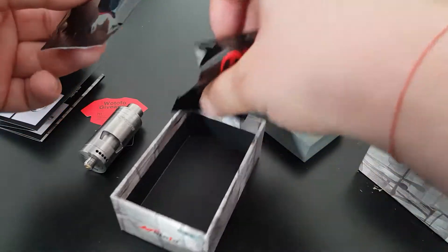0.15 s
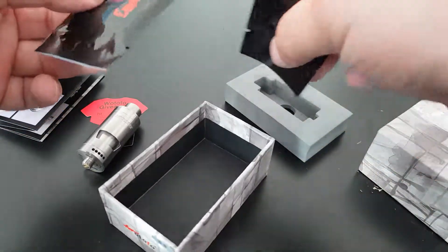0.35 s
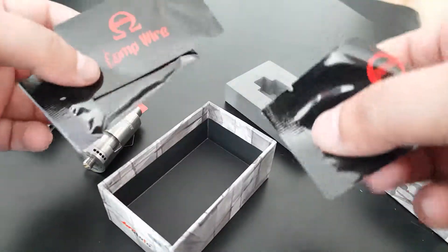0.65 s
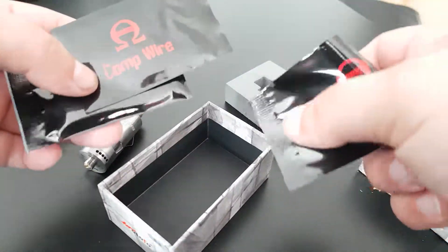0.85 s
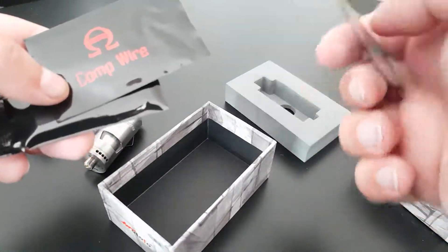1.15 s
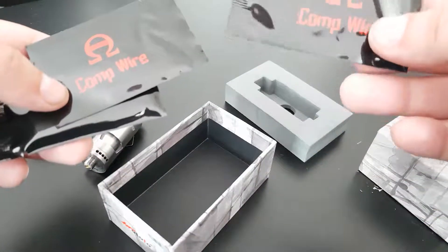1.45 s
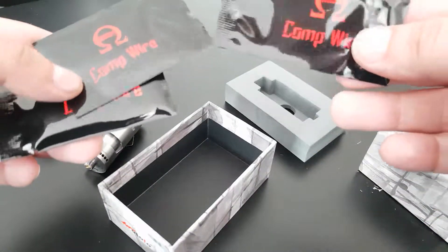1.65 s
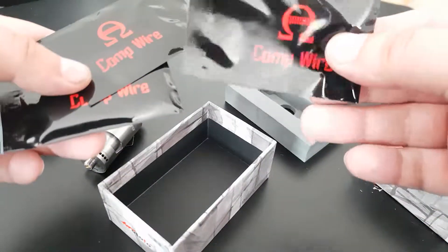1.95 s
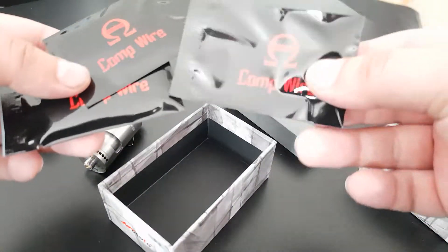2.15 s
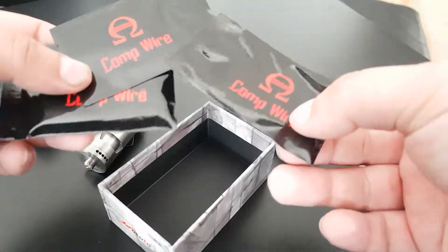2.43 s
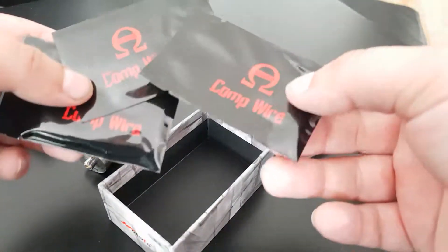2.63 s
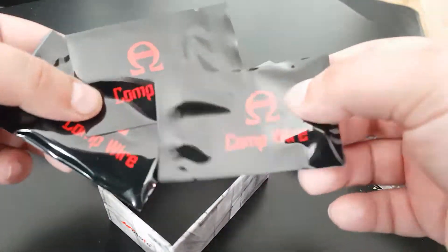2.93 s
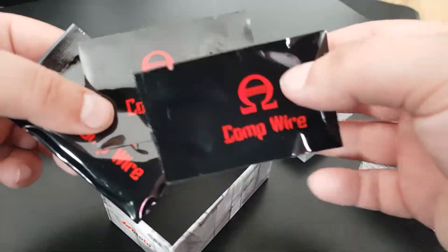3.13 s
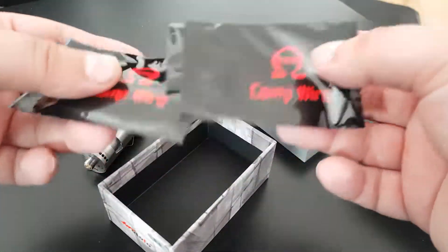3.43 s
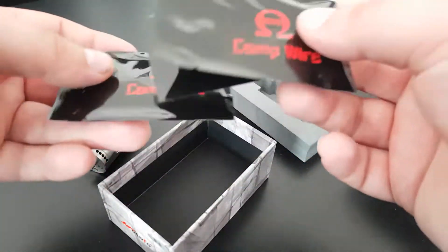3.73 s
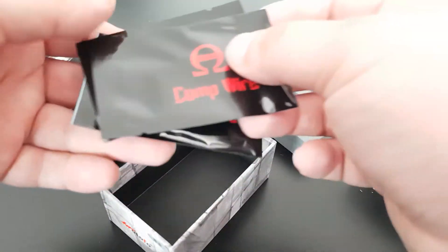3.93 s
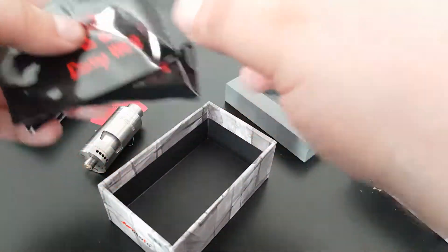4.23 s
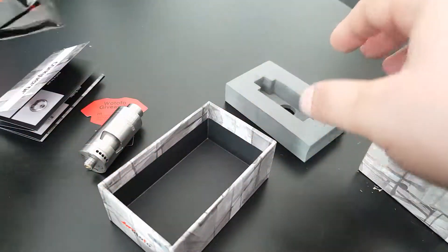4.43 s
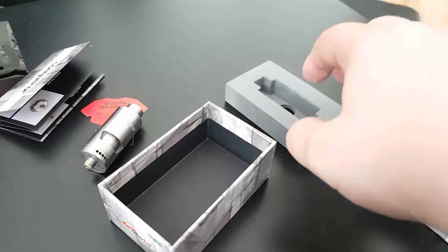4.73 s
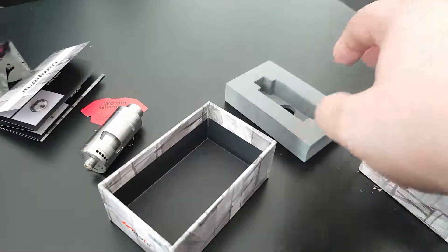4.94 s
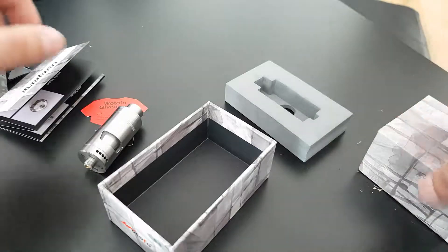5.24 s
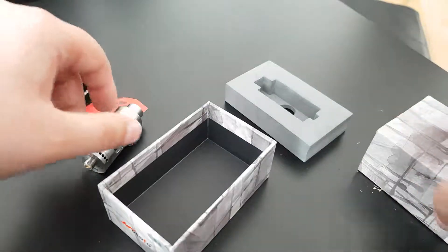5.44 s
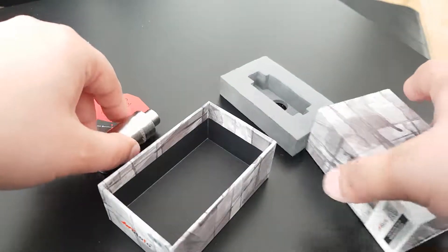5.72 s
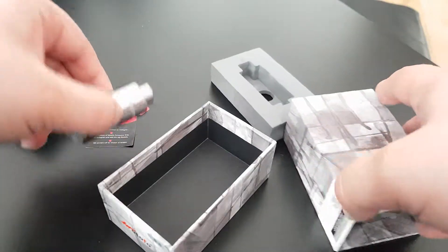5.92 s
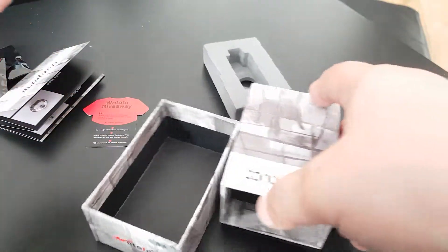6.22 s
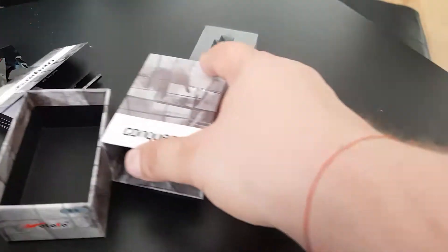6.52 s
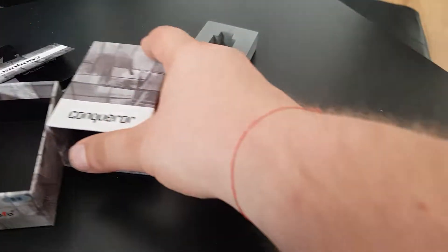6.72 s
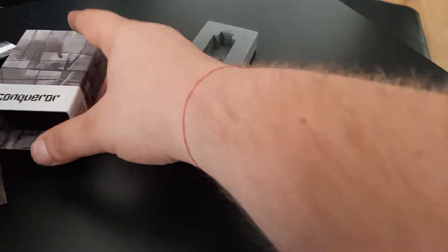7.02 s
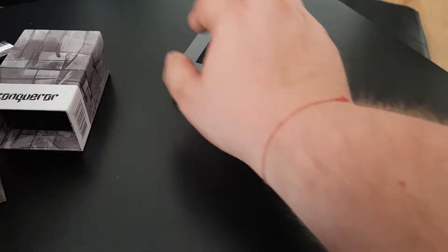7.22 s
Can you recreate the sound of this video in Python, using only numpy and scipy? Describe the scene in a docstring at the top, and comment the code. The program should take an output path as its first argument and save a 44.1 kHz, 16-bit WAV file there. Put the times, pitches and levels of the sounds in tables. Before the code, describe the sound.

Stereo, close and dry indoors over a faint low hum. After a brief card scrape, foil packets crinkle in irregular spurts, with several sharp snaps around two seconds and a cluster past four. A short lull follows, then dull knocks on the table, a firm cardboard clap, a lighter bump and two rough card slides, ending almost quiet.

```python
"""Crisp foil crackle and sharp snaps come first, then knocks on a table and the dry glide of cardboard.
Close by, small sachets are pulled from a box and turned in the fingers: rubbed film is slip noise, snaps ring briefly.
They are laid aside, a metal part knocks as it is picked up, and the box sleeve glides, bumps the tray and pushes it
across the table: softened blows ring modes, card slides as uneven slips, some resonances sound hollow.
A small room with a low noise hum and a diffuse tail, heard through two spaced microphones."""
import sys
import numpy as np
from scipy import signal
from scipy.io import wavfile

SR = 44100
rng = np.random.default_rng(int(sys.argv[2]) if len(sys.argv) > 2 else 0)


def materialize(psi):
    """Save the field psi as 16-bit PCM at rate SR to the path in sys.argv[1].

    A 1-D psi becomes a single channel; in a 2-D psi each row is a channel.
    """
    bounded = np.clip(np.atleast_2d(psi).T, -1, 1)
    quanta = np.round(bounded * 32767).astype(np.int16)
    wavfile.write(sys.argv[1], SR, quanta)


N = 325017

# colour of the air in the room: f/Hz, relative density/dB per Hz
AIR_COLOUR = [(350, -3), (1000, -9.5), (1600, -19), (16000, -17)]
# colour of the low hum: f/Hz, relative density/dB per Hz
HUM_COLOUR = [(25, -5.5), (36, 12), (55, -24.5), (85, 8), (130, 6), (170, -0.5), (220, 4.5), (280, 4),
              (380, -29)]
# hum of the room, swelling as the table rumbles under the arms and the sliding box: t/s, level/dB before panning
HUM_LEVEL = [(0, -60), (1.9, -59), (2.8, -61.5), (4.1, -55.5), (5.4, -57), (6.4, -50.5), (7.37, -54.5)]
# colour of the room tail: f/Hz, relative density/dB per Hz
TAIL_COLOUR = [(200, 4), (1000, 1.5), (7000, -3.5), (16000, 3)]
# decay of the room tail: f/Hz, t60/s
TAIL_T60 = [(300, 0.27), (5000, 0.25), (15000, 0.17)]
# likeness of the two microphones: f/Hz, left-right correlation
MIC_LIKENESS = [(300, 0.95), (700, 0.52), (1300, 0.077), (16000, 0)]

# blows on the table top: t/s, relative level/dB, softness as cut-off f/Hz
TABLE_BLOWS = [(5.503, -28, 300), (5.519, -22, 210), (5.5875, -17.5, 1740), (5.728, -26, 181),
               (6.14, -33, 904), (7.342, -37, 350)]
# blows on the open cardboard tray: t/s, relative level/dB, softness as cut-off f/Hz
TRAY_BLOWS = [(.095, -36, 780), (.845, -39.5, 1210), (4.927, -39, 1022), (6.2872, -23.5, 1140),
              (6.296, -26.5, 1100), (6.3325, -36, 5970), (6.862, -30, 960)]
# the sleeve drops on the table and bounces: t/s, relative level/dB, softness as cut-off f/Hz
SLEEVE_BLOWS = [(6.1392, -13.5, 2040), (6.1618, -25, 1963), (6.177, -32.5, 2300)]
# modes of the table top: f/Hz, relative level/dB, t60/s
TABLE_TOP_MODES = [(138.7, -53, .25), (213, -16, 0.19), (266, 13, 0.028), (277, 9, 0.083),
                   (347, -7.5, 0.04), (507, -8, 0.044), (605, -12, 0.086), (940, -17, 0.094),
                   (1168, -12.5, .05)]
# modes of the sleeve: f/Hz, relative level/dB, t60/s
SLEEVE_MODES = [(502, -19.5, 0.089), (871, -2, 0.035), (1080, -3, 0.012), (1345, -1, 0.025),
                (1990, 3.5, 0.019)]
# modes of the tray: f/Hz, relative level/dB, t60/s when struck (halved under sliding)
TRAY_BODY_MODES = [(225, -1.5, 0.033), (493, -17.5, 0.13), (906, 0, 0.017), (1093, -6, 0.065),
                   (1312, -4, 0.01), (2100, 1.5, 0.018), (2700, 2.5, 0.023)]

# pushes sliding on cardboard, or cardboard on the table: start t/s, length/s, scrape level/dB, hiss level/dB
# (levels at the start, before judder and panning)
CARD_PUSHES = [(.035, .11, -54.5, -46), (5.5, 0.37, -58.5, -54.5), (5.93, 0.093, -64.5, -55.5),
               (6.13, 0.38, -60, -51), (6.34, 0.1, -49.5, -43.5), (6.47, 0.39, -50, -47.5),
               (6.88, 0.15, -47, -48)]
# colour of the card's scrape: f/Hz, relative density/dB per Hz
SCRAPE_COLOUR = [(330, 10.5), (480, -13), (700, 12.5), (1050, 3), (1500, 13), (2800, -22.5)]
# colour of the card's hiss: f/Hz, relative density/dB per Hz
CARD_HISS_COLOUR = [(2000, 3.5), (2900, 5.5), (4400, 4.5), (9000, -2), (13000, 4.5), (16000, -8.5)]
# resonances of the open sleeve while it glides: start t/s, length/s, level/dB, f/Hz, t60/s
SLEEVE_HOLLOWS = [(5.496, 1, -58.5, 1220, 0.018), (5.502, 0.36, -65.5, 3300, 0.039),
                  (6.884, 0.13, -47, 1092, 0.035)]
# a card edge chatters on the table: t/s, level/dB at the swell's peak, f/Hz
EDGE_CHATTER = [(6.378, -47, 2580), (6.391, -48.5, 1290), (6.44, -49, 3100), (.105, -55.5, 793)]

# foil creases at set times, from faint ticks to sharp snaps:
# t/s, relative crack level/dB, crack f/Hz, relative level of the sheet's low flex/dB
FOIL_SNAPS = [(.0258, -38, 4800, -35.5), (.2514, -30, 2560, -30), (.2859, -36.5, 2930, -28.5),
              (.3424, -36, 4030, -32.5), (.54, -37, 4250, -35.5), (.6654, -44, 4250, -38),
              (.7188, -39, 4200, -45), (.7312, -35, 4180, -26), (.8258, -37, 4340, -37),
              (.96, -29, 4100, -35.5), (1.1009, -33.5, 5660, -41.5), (1.356, -37, 7700, -32),
              (1.7479, -31, 4700, -30), (2.0283, -23, 6750, -37), (2.1457, -21, 7600, -52),
              (2.2811, -24, 7100, -38), (2.3076, -34.5, 5160, -57), (2.35, -38, 2500, -65),
              (2.3671, -18, 4070, -21), (2.922, -36, 4530, -43), (3.312, -33.5, 3540, -27.5),
              (3.3382, -38.5, 3600, -59), (3.3485, -41, 3360, -51), (3.3847, -33.5, 7800, -40),
              (3.4159, -36.5, 4430, -33), (3.5135, -45.5, 2150, -51), (3.5452, -40, 8630, -46),
              (3.5762, -34, 4300, -28.5), (3.5918, -34.5, 8220, -56), (3.6412, -41.5, 4200, -42),
              (3.7185, -38.5, 6850, -45), (3.8557, -41, 6640, -45.5), (3.8962, -46.5, 4850, -35.5),
              (4.0284, -31, 3900, -26), (4.1104, -26.5, 4330, -23.5), (4.1178, -33, 5570, -47),
              (4.1265, -25.5, 5940, -32), (4.131, -26.5, 5050, -46), (4.141, -30, 5340, -45),
              (4.2295, -29, 3460, -29), (4.2432, -39, 6500, -52), (4.2679, -24, 8000, -33),
              (4.3886, -42, 8200, -58), (4.675, -48.5, 5600, -66), (4.6992, -41, 5340, -53),
              (4.734, -41, 4030, -37.5), (4.8309, -40.5, 5260, -40)]
# finger strokes on foil film: start t/s, length/s, hiss level/dB, low scuff level/dB, ring of pinched film f/Hz
# (levels at the start, before placing)
FINGER_RUBS = [(0.251, 0.069, -41, -50.5, 4600), (0.4, 0.0085, -47.5, -58, 4530),
               (0.46, 0.18, -55, -59.5, 4100), (0.652, 0.089, -45, -49.5, 4740),
               (0.809, 0.013, -48.5, -54, 4700), (0.986, 0.085, -59.5, -68.5, 4600),
               (1.222, 0.14, -56.5, -60, 4600), (1.678, 0.13, -59.5, -73, 4920),
               (1.877, 0.049, -47.5, -55, 4900), (2.356, 0.083, -52.5, -55.5, 5060),
               (2.586, 0.026, -59.5, -65, 6700), (2.9, 0.25, -65.5, -66, 5460),
               (3.286, 0.15, -52, -47.5, 3280), (3.534, 0.061, -45.5, -52, 8400),
               (3.856, 0.42, -55, -58.5, 3560), (4.096, 0.19, -46.5, -46.5, 3800),
               (4.428, 0.062, -55.5, -64, 4700), (4.728, 0.2, -56, -51.5, 3820),
               (4.946, 0.058, -51.5, -58, 3280)]
# colour of the film's crackle: f/Hz, relative density/dB per Hz
FOIL_HISS_COLOUR = [(1800, -25.5), (2600, 0), (4400, 0), (6500, 3), (9000, -6.5), (13000, -3), (16000, -12)]
# colour of the film's scuff: f/Hz, relative density/dB per Hz
FOIL_SCUFF_COLOUR = [(300, -12), (550, -15.5), (850, -4), (1400, -20), (2200, -7), (3200, -26.5)]
# how the sachets are held: t/s, left-right level difference/dB
GRIP_SIDE = [(.3, -1.5), (.9, -8), (2.9, -3.5), (4.2, -1)]

AIR_DB = -70  # before panning
CUTOFF_HZ = 16300
PUSH_ATTACK_S, PUSH_RELEASE_DB_PER_S, PUSH_SAG_DB_PER_S = 0.095, 218.5, 3
RUB_ATTACK_S, RUB_RELEASE_DB_PER_S, RUB_SAG_DB_PER_S = 0.04, 193, 14.5
PINCH_RING_DB, PINCH_RING_CYCLES = -6.5, 21  # level against the crackle, t60 in cycles
# further creases give way at random while the foil is rubbed
CREASES_PER_S, CREASE_OVER_HISS_DB, CREASE_SPREAD_DB = 27, -1, 2.3
CREASE_HZ, CREASE_SPREAD_OCTAVES, CREASE_FLEX_DB = 4400, 0.1, -8.5


def from_db(db):
    """Decibels to gain."""
    return 10 ** (np.asarray(db) / 20)


def rms_one(x):
    """Scale to unit rms."""
    return x / np.sqrt(np.mean(x ** 2) + 1e-20)


def in_time(rows):
    """Each level column of a curve at every sample."""
    s, *columns = np.transpose(rows)
    return [np.interp(np.arange(N) / SR, s, column) for column in columns]


def at_hz(points, hz):
    """Read a table on a log-frequency axis."""
    table_hz, values = np.array(points)[:, 0], np.array(points)[:, 1]
    return np.interp(np.log(hz), np.log(table_hz), values)


def cut(x, hz, kind, order=2):
    """Butterworth filter."""
    sos = signal.butter(order, np.clip(hz, 10, .45 * SR), kind, fs=SR, output="sos")
    return signal.sosfilt(sos, x + 1e-18)


def panned(db):
    """Gains of the two sides for a left-right difference."""
    return from_db(np.array([[.5], [-.5]]) * db)


def drift(rate):
    """Slow chance: straight lines between random knots of spread 1, so many knots per second."""
    knots = rng.standard_normal(int(N / SR * rate) + 2)
    return np.interp(np.arange(N) * rate / SR, np.arange(len(knots)), knots)


def ring(clicks, hz, t60):
    """A two-pole resonance: a unit click sets a decaying sine of initial height 1 ringing."""
    r = from_db(-60 / (t60 * SR))
    w = 2 * np.pi * hz / SR
    return signal.lfilter([0, np.sin(w)], [1, -2 * r * np.cos(w), r * r], clicks + 1e-18)


def add(out, s, sound):
    """Mix a short sound in at time s."""
    i = int(np.clip(round(s * SR), 0, N - 1))
    out[..., i:i + sound.shape[-1]] += sound[..., :N - i]


def bands(drive, spectrum):
    """Half-octave stereo bands of two mid/side drives dealt in turn; the bass is alike on both sides."""
    edges = 24 * 2 ** (np.arange(20) / 2)
    for k, (low, high) in enumerate(zip(edges, edges[1:])):
        hz = np.sqrt(low * high)
        if high > spectrum[0][0] and low < spectrum[-1][0]:
            mid, side = cut(drive[k % 2], [low, high], "band")
            alike = np.clip(at_hz(MIC_LIKENESS, hz), -1, 1)
            stereo = np.sqrt(1 + alike) * mid + np.sqrt(1 - alike) * side * [[1], [-1]]
            yield hz, from_db(at_hz(spectrum, hz)) * stereo


def steady_noise(spectrum):
    """Smooth coloured stereo noise, rms 1."""
    drive = rng.standard_normal((2, 2, N))
    return rms_one(sum(band for hz, band in bands(drive, spectrum)))


def friction(spectrum, slips_per_s, spread_db, smooth):
    """Tiny uneven slips burst briefly over a smooth hiss; the colour shifts as the contact moves; rms 1."""
    sizes = from_db(spread_db * np.minimum(rng.exponential(1, N), 3))
    slips = (rng.random(N) < slips_per_s / SR) * sizes
    decay = np.exp(-1 / (0.0018 * SR))
    bursts = rms_one(signal.lfilter([1], [1, -decay], slips + 1e-18))
    drive = rng.standard_normal((2, 2, N)) * np.sqrt(bursts ** 2 + smooth ** 2)
    return rms_one(sum(band * from_db(1.2 * drift(40)) for hz, band in bands(drive, spectrum)))


def strokes(rows, attack_s, release_db_per_s, sag_db_per_s, span=slice(None)):
    """A stroke swells, eases while it lasts and dies away; one gain curve per level column, overlaps add in power."""
    t, power = np.arange(N)[span] / SR, 0
    for start, length, *levels_db in rows:
        swell = np.clip((t - start) / attack_s + .5, 0, 1)
        sag_db = sag_db_per_s * np.clip(t - start, 0, length)
        release_db = release_db_per_s * np.clip(t - start - length, 0, 1)
        power = power + np.outer(from_db(levels_db), swell * from_db(-sag_db - release_db)) ** 2
    return np.sqrt(power)


def room_air():
    """Faint steady noise of the room, falling towards the treble."""
    return from_db(AIR_DB) * steady_noise(AIR_COLOUR)


def room_hum():
    """Low coloured noise that slowly swells and eases."""
    return from_db(in_time(HUM_LEVEL)[0]) * steady_noise(HUM_COLOUR)


def room(x, tail_db=-16.5, first_s=.008):
    """The walls return a diffuse tail after a short gap; it dies sooner in the treble."""
    t = np.arange(SR // 2) / SR
    noise = bands(rng.standard_normal((2, 2, len(t))), TAIL_COLOUR)
    tail = sum(band * from_db(-60 * t / at_hz(TAIL_T60, hz)) for hz, band in noise)
    response = from_db(tail_db) * rms_one(tail * (t > first_s)) / np.sqrt(len(t))
    sent = x.mean(axis=0, keepdims=True) * np.sqrt(2)
    return signal.fftconvolve(sent, response, axes=1)[:, :N]


def placed(x, pan_db, lag):
    """A source to one side is louder there, its top slightly the other way; the left lags by some samples."""
    low = cut(x, 13000, "low", order=1)
    left, right = low * panned(pan_db) + (x - low) * panned(-.5 * pan_db)
    delayed_left = np.interp(np.arange(N) - lag, np.arange(N), left, left=0)
    return np.stack([delayed_left, right])


def table_drone(start_s=5.4, db=-58):
    """Dragging keeps the lowest mode of the table top sounding."""
    swell = np.clip((np.arange(N) / SR - start_s) / 0.023, 0, 1)
    mode = ring(rng.standard_normal(N), TABLE_TOP_MODES[0][0], t60=0.99)
    return from_db(db) * swell * rms_one(mode)


def struck(knocks, modes, crack_db, crack_t60, radiates_hz):
    """Each softened blow rings every mode at a strength of its own, plus a short burst of dense high modes."""
    pushes, burst = np.zeros((len(modes), N)), np.zeros((2, N))
    t = np.arange(2048) / SR
    for s, db, soft_hz in knocks:
        push = from_db(db) * cut(signal.unit_impulse(len(t)), soft_hz, "low")
        add(pushes, s, push * from_db(rng.normal(0, 1, (len(modes), 1))))
        crack = rng.standard_normal((2, len(t))) * from_db(db + crack_db - 60 * t / crack_t60)
        add(burst, s, cut(cut(crack, 2 * radiates_hz, "high"), soft_hz, "low"))
    body = 0
    for k, (hz, db, t60) in enumerate(modes):
        body = body + (-1) ** k * from_db(db) * ring(pushes[k], hz, t60)
    return cut(body + burst, radiates_hz, "high")  # a panel hardly radiates below its first modes


def hollow_sleeve(attack_s=0.063, release_db_per_s=200):
    """Light, even friction keeps resonances of the sleeve sounding while the contact lasts."""
    out = 0
    for start, length, db, hz, t60 in SLEEVE_HOLLOWS:
        gain = strokes([(start, length, db)], attack_s, release_db_per_s, 0)
        out = out + gain * rms_one(ring(rng.standard_normal((2, N)), hz, t60))
    return out


def edge_chatter(width_s=0.0332):
    """Uneven slips jolt one resonance of the card for a few hundredths of a second: a broken, rasping note."""
    out, t = np.zeros((2, N)), np.arange(SR // 4) / SR
    middle = t.mean()
    for s, db, hz in EDGE_CHATTER:
        slips = (rng.random(len(t)) < 330 / SR) * (1 + .6 * rng.standard_normal((2, len(t))))
        note = rms_one(ring(slips, hz, t60=22 / hz))
        swell = np.exp(-((t - middle) / width_s) ** 2)
        add(out, s - middle, from_db(db) * swell * note)
    return out


def card_slide(body_db=-5, judder_db=0.4, judders_per_s=30):
    """Card edges catch in uneven slips; as the contact shifts, now one tray mode speaks and now another."""
    scrape_gain, hiss_gain = strokes(CARD_PUSHES, PUSH_ATTACK_S, PUSH_RELEASE_DB_PER_S, PUSH_SAG_DB_PER_S)
    scrape = friction(SCRAPE_COLOUR, slips_per_s=550, spread_db=1.5, smooth=.7)
    judder = judder_db * drift(judders_per_s)
    body = 0
    for hz, db, t60 in TRAY_BODY_MODES:
        body = body + from_db(db + 4 * drift(16)) * ring(scrape, hz, t60 / 2)
    low = scrape_gain * from_db(judder) * rms_one(scrape + from_db(body_db) * rms_one(body))
    hiss = friction(CARD_HISS_COLOUR, slips_per_s=3000, spread_db=3, smooth=1.2)
    return (low + hiss_gain * from_db(judder / 2) * hiss) * panned(-1.3)


def foil_rub():
    """The film crackles as it slides, rings at a pitch set by each new pinch and scuffs lower where it drags."""
    crackle = friction(FOIL_HISS_COLOUR, slips_per_s=250, spread_db=5.5, smooth=.6)
    drag = friction(FOIL_SCUFF_COLOUR, slips_per_s=150, spread_db=4.5, smooth=.6)
    out = np.zeros((2, N))
    for start, length, hiss_db, scuff_db, hz in FINGER_RUBS:
        near = slice(max(int((start - RUB_ATTACK_S) * SR), 0), int((start + length + .5) * SR))
        row = (start, length, hiss_db, scuff_db)
        hiss_gain, scuff_gain = strokes([row], RUB_ATTACK_S, RUB_RELEASE_DB_PER_S, RUB_SAG_DB_PER_S, near)
        taut = rms_one(ring(crackle[:, near], hz, PINCH_RING_CYCLES / hz))
        hiss = rms_one(crackle[:, near] + from_db(PINCH_RING_DB) * taut)
        out[:, near] += hiss_gain * hiss + scuff_gain * drag[:, near]
    return out


def random_creases(count=80):
    """Rows like FOIL_SNAPS for creases that give way during strokes; a firmer stroke makes them louder."""
    rows = []
    for start, length, hiss_db, *_ in FINGER_RUBS:
        waits = rng.exponential(1 / CREASES_PER_S, count)
        chance = rng.standard_normal((count, 2))
        for after, (size, pitch) in zip(np.cumsum(waits), chance):
            if after < length:
                db = hiss_db + CREASE_OVER_HISS_DB + CREASE_SPREAD_DB * size
                hz = CREASE_HZ * 2 ** np.clip(CREASE_SPREAD_OCTAVES * pitch, -1, 1)
                rows.append((start + after, db, hz, db + CREASE_FLEX_DB))
    return rows


def foil_snaps(creases, spike, film_t60, ring_cycles, broad, top_hz):
    """A crease flips: a sharp spike, then dense film modes die in milliseconds; facet size sets the pitch."""
    out, t = np.zeros((2, N)), np.arange(1024) / SR
    for s, crack_db, hz, flex_db in creases:
        shared, *own = rng.standard_normal((3, len(t)))
        drive = (shared + np.array(own)) / np.sqrt(2) * from_db(-60 * t / film_t60)
        drive[:, 2] += spike * rng.choice([-1, 1])
        # the more the sheet flexes, the harder a neighbouring facet follows a moment later
        follows = int(rng.uniform(.001, .0035) * SR)
        drive[:, follows:] += from_db(min(flex_db - crack_db, 0) - 2.5) * drive[:, :-follows]
        facet = rms_one(np.diff(ring(drive, hz, ring_cycles / hz), prepend=0))
        sheet = rms_one(cut(cut(drive, 2000, "high"), top_hz, "low", order=1))
        crack = from_db(crack_db - 5.5) * rms_one(facet + broad * sheet)
        flex = from_db(flex_db - 15.5) * rms_one(cut(drive, [880, 2200], "band"))
        add(out, s, crack + flex)
    return out


def scene():
    """Foil, table and card close by in the room, over its hum."""
    background = (room_hum() + table_drone() + room_air()) * panned(-2.3)
    table = struck(TABLE_BLOWS, TABLE_TOP_MODES, crack_db=-3.5, crack_t60=0.036, radiates_hz=179)
    table = placed(table, pan_db=-2.5, lag=6.7)
    sleeve = struck(SLEEVE_BLOWS, SLEEVE_MODES, crack_db=5.0, crack_t60=0.026, radiates_hz=362)
    sleeve = placed(sleeve, pan_db=-2.0, lag=8.1)
    tray = struck(TRAY_BLOWS, TRAY_BODY_MODES, crack_db=3.5, crack_t60=0.039, radiates_hz=166)
    tray = placed(tray, pan_db=-3.5, lag=2.74)
    card = sleeve + tray + card_slide() + edge_chatter()

    rub, pan_db = foil_rub(), in_time(GRIP_SIDE)[0]
    creases = list(FOIL_SNAPS) + random_creases()
    snaps = foil_snaps(creases, spike=2.8, film_t60=.011, ring_cycles=7, broad=.8, top_hz=8000)
    # summed over all directions, the fine colour of a snap evens out
    snaps_to_walls = foil_snaps(creases, spike=29.1, film_t60=.002, ring_cycles=5.5, broad=0.555, top_hz=5535)
    foil = placed(snaps + rub, pan_db, lag=-1.3 * pan_db)
    reflected = room(snaps_to_walls + rub + table + card)
    return foil + table + card + hollow_sleeve() + reflected + background


def record(dry):
    """Full scale limits the peaks; the top is cut."""
    low_pass = signal.ellip(10, .1, 80, CUTOFF_HZ, fs=SR, output="sos")
    return signal.sosfilt(low_pass, np.clip(dry, -1, 1))


dry = scene()
out = record(dry)
materialize(out)
```